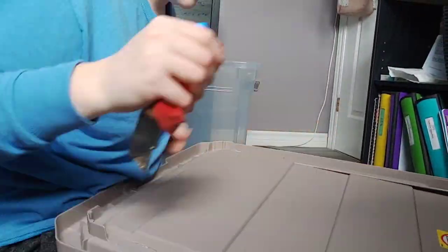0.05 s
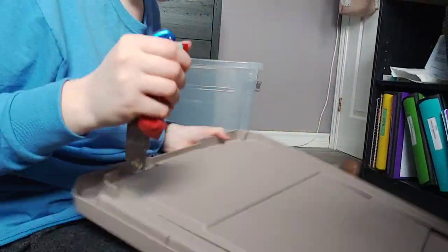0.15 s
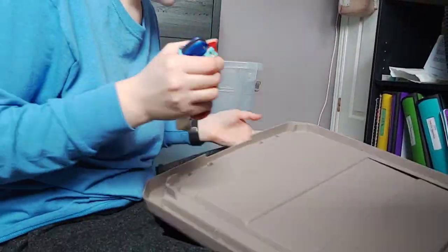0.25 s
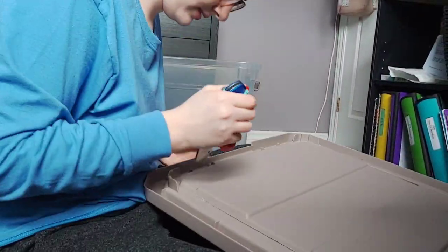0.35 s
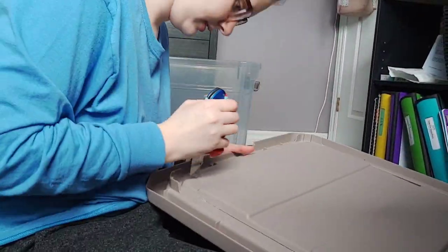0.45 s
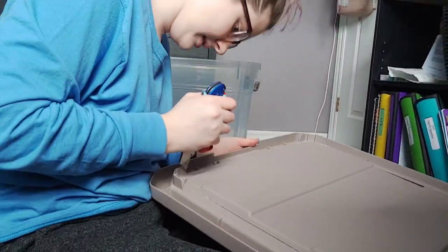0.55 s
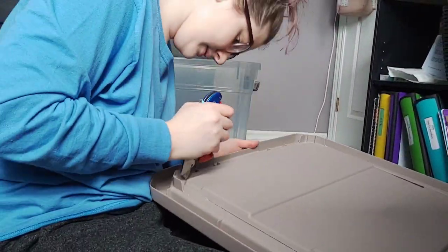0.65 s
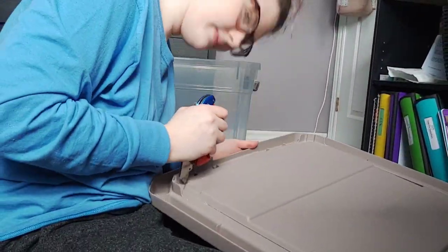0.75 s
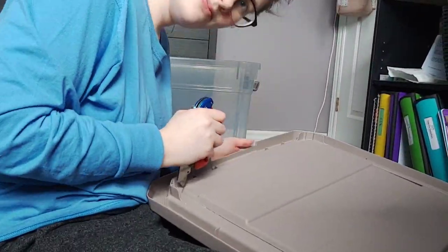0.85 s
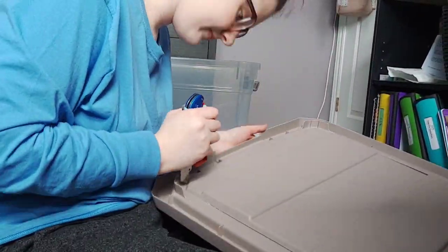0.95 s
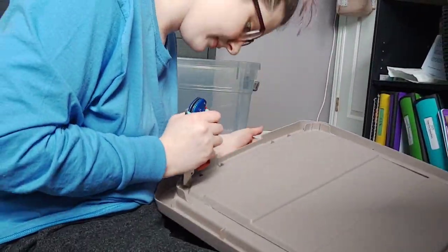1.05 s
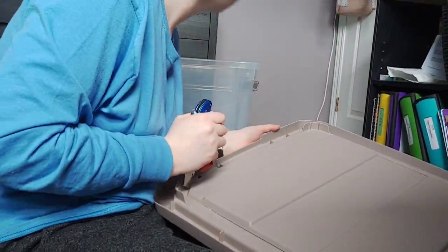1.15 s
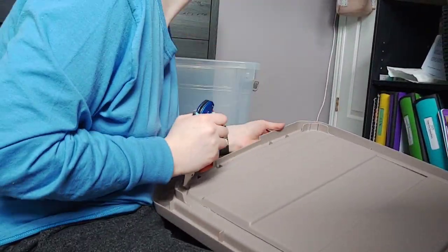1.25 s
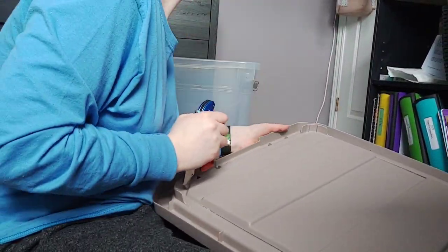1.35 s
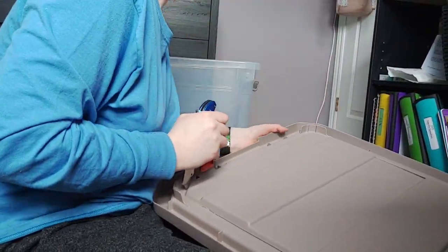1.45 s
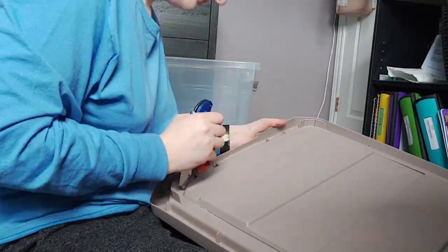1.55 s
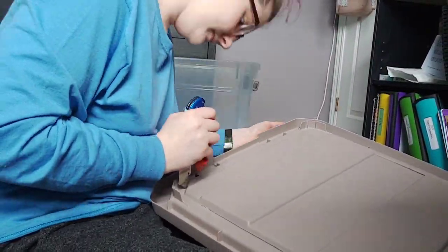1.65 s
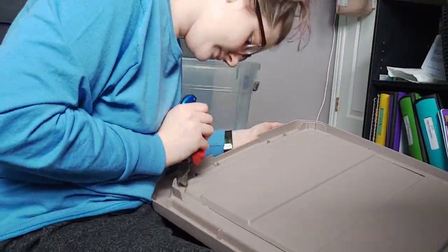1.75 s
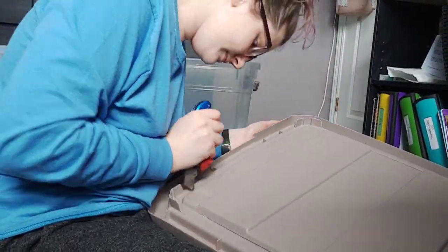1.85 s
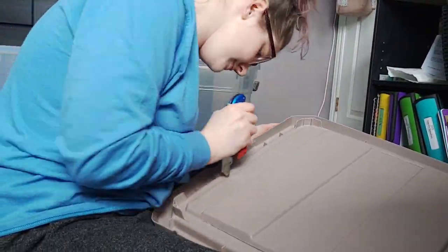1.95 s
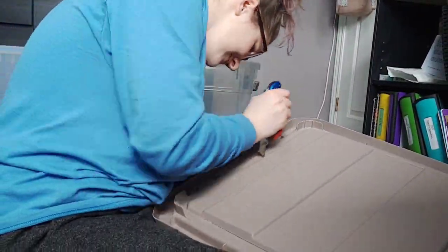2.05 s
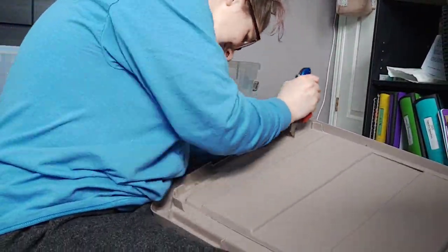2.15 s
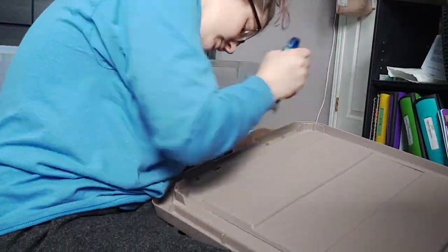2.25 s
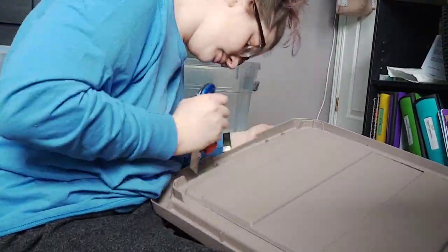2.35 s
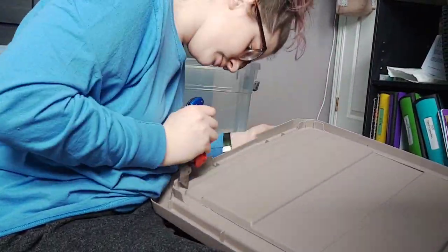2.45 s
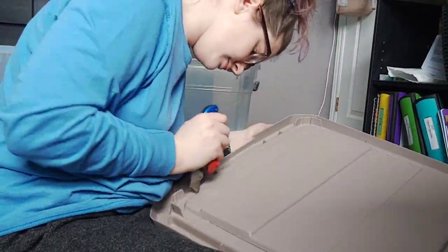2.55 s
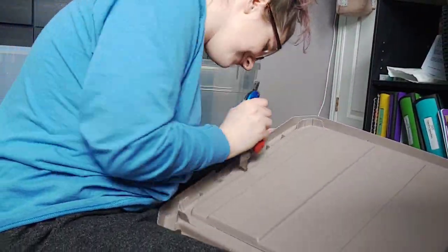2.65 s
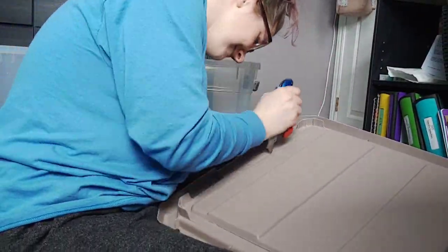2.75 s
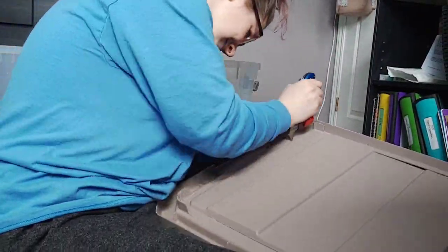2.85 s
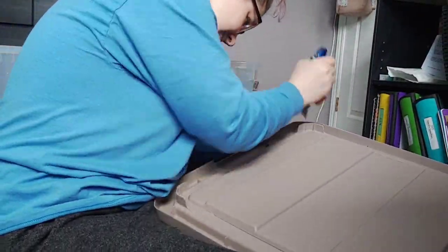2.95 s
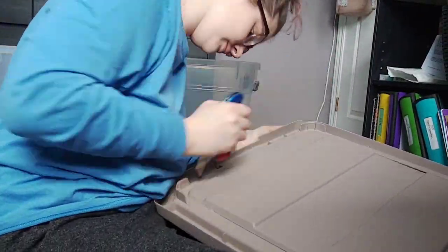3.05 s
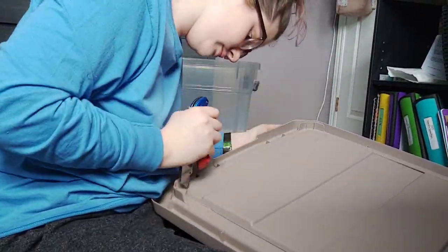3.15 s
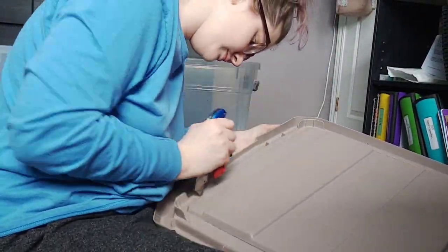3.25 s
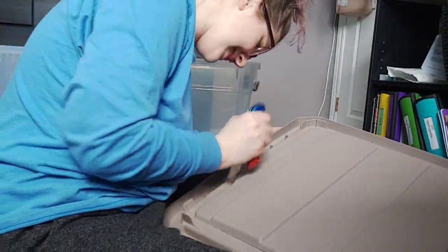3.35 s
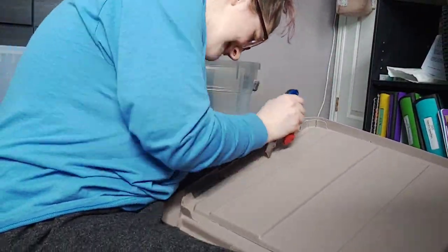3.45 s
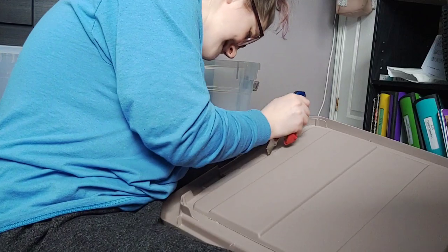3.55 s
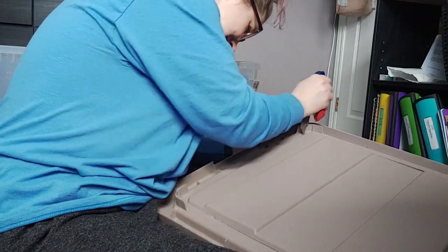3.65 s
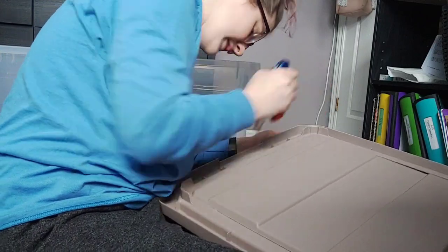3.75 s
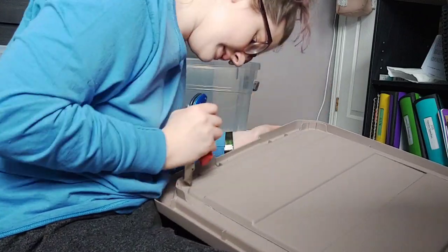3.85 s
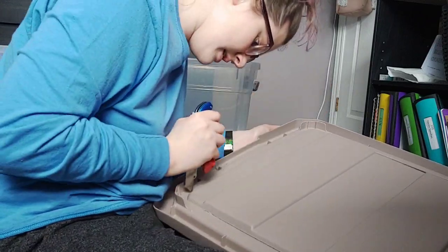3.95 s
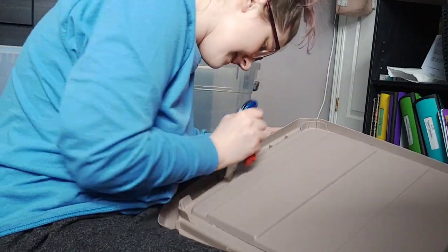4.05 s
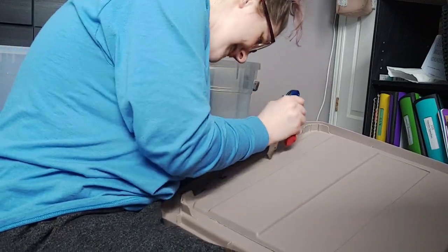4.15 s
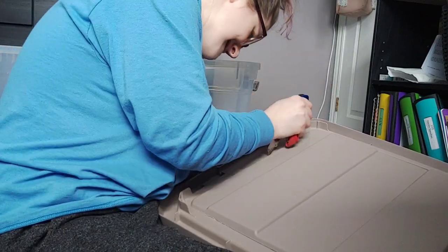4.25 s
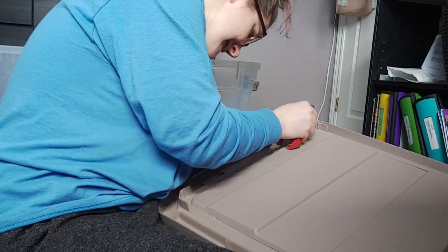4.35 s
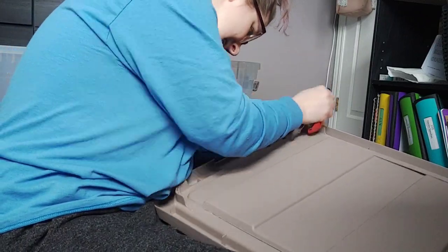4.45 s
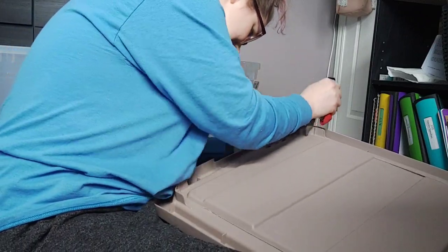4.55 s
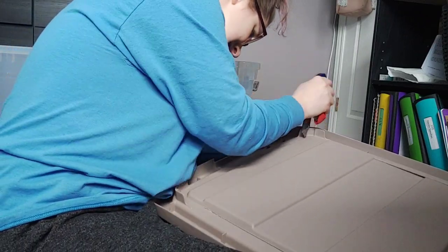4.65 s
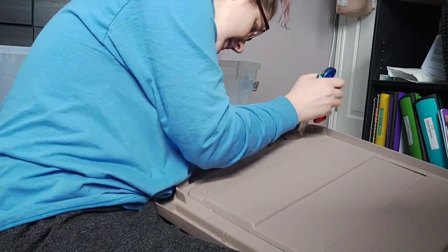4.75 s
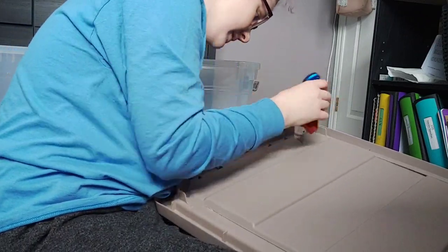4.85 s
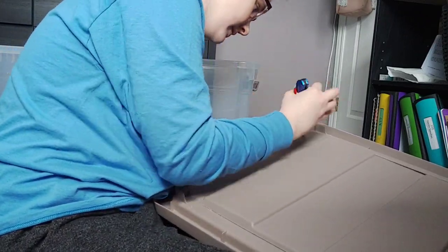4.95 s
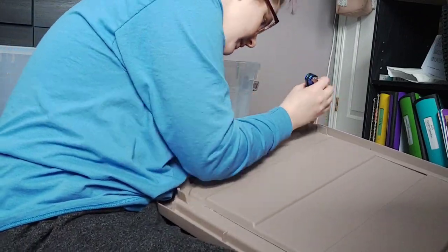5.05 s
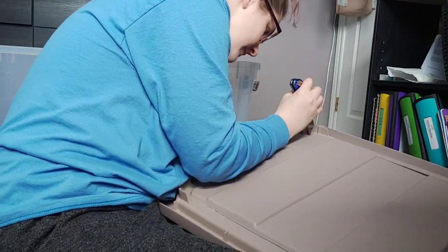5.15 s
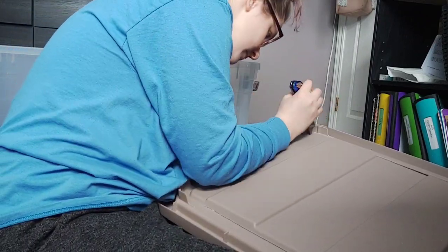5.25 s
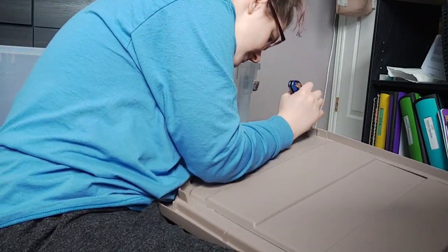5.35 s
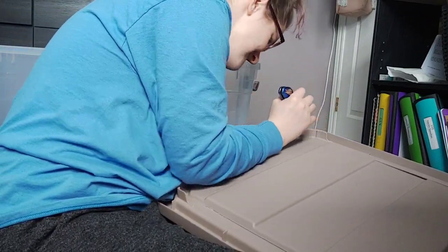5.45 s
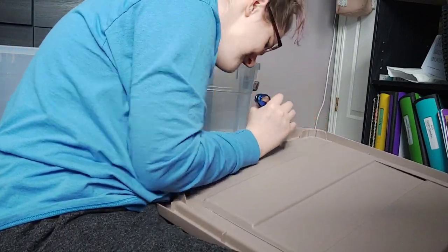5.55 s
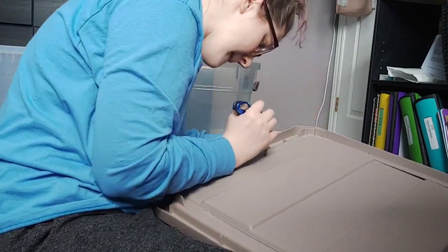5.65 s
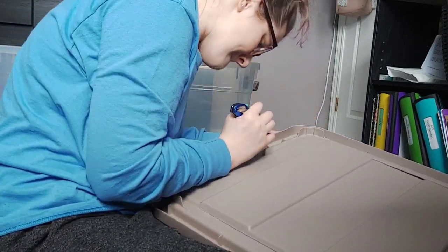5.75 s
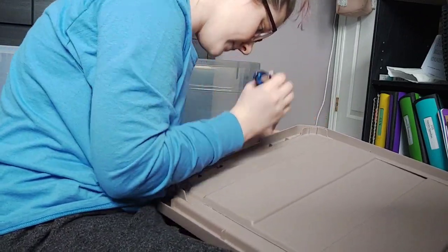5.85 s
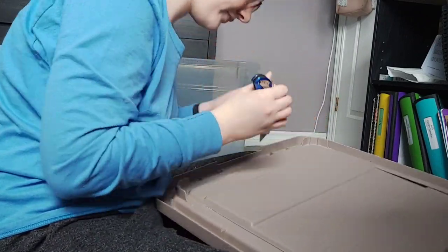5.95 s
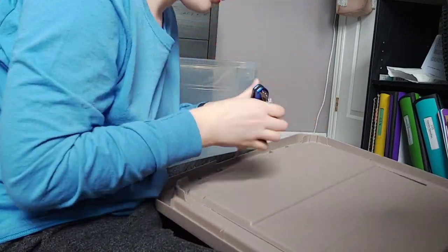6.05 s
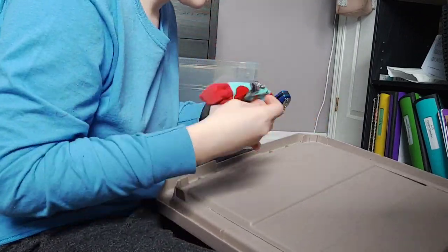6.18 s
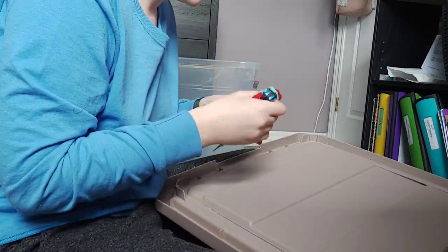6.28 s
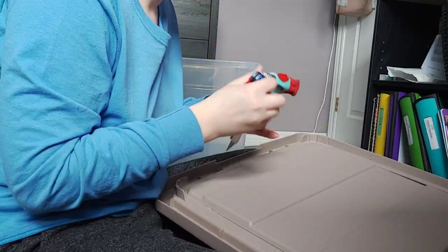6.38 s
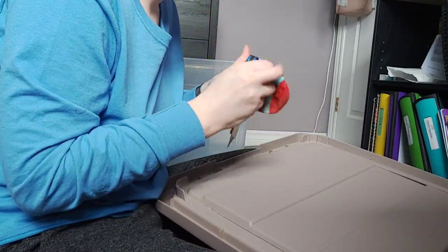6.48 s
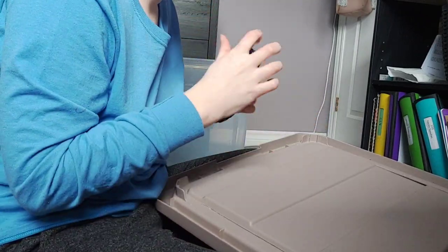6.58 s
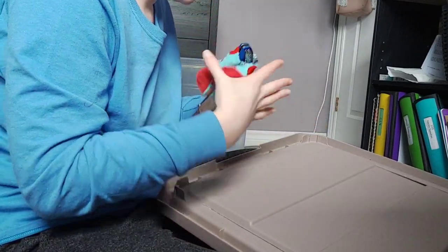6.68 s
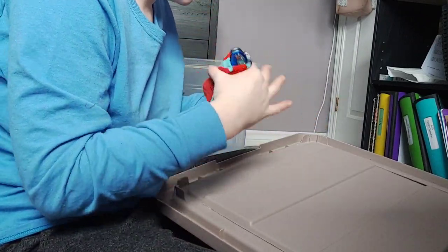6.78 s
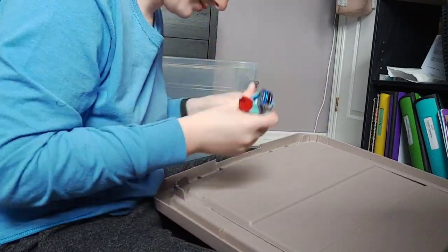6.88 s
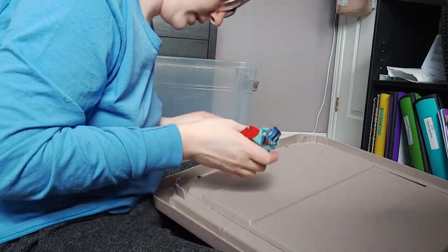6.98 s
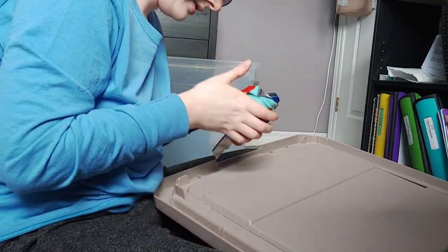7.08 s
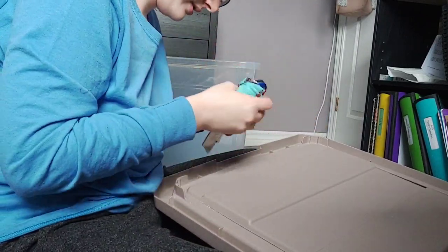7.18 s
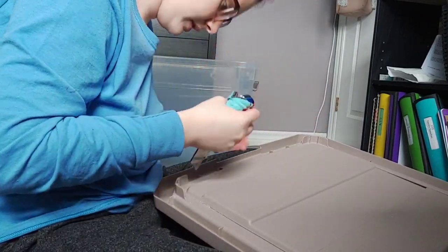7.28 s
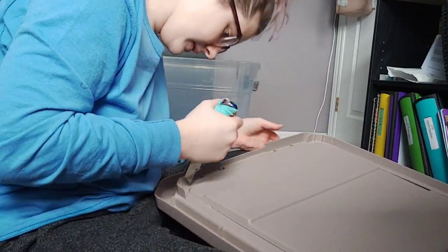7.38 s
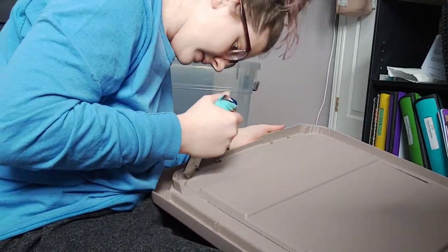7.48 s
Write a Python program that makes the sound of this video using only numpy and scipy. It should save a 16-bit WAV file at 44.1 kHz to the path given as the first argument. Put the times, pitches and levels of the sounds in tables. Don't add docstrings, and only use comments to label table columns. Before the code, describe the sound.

Close, dry scraping and cracking of hard plastic under a blade, with sharp snaps, dull lid knocks, and soft handling near the end.

```python
import sys
import numpy as np
from scipy import signal
from scipy.io import wavfile
from scipy.ndimage import uniform_filter1d

SR = 44100
rng = np.random.default_rng(int(sys.argv[2]) if len(sys.argv) > 2 else 0)


def boost_factor(decibels):
    exponent = np.asarray(decibels, float) / 20
    return 10 ** exponent


def store_wav(level_fs):
    pcm = np.round(np.clip(np.atleast_2d(level_fs), -1, 1) * 32767)
    wavfile.write(sys.argv[1], SR, pcm.T.astype(np.int16))


N = 331632

CUT_SLOPE_DB, BRUSH_SLOPE_DB, SLEEVE_SLOPE_DB = 0.15, -4, 4.5
SCRAPE_ECHO_DB, BREAK_ECHO_DB, SNAP_ECHO_DB = -12.5, -7.5, -14.5
FRACTURE_BOOM_HZ = 480


def evened(x):
    return x / np.sqrt(np.mean(x ** 2) + 1e-20)


def peak_evened(x):
    return x / np.sqrt(uniform_filter1d(x ** 2, size=180).max())


def read(points, hz):
    f, value = np.transpose(points)
    return np.interp(np.log(hz + 1), np.log(f + 1), value)


def add(mix, s, sound):
    part = mix[..., max(round(s * SR), 0):][..., :sound.shape[-1]]
    part += sound[..., :part.shape[-1]]


def causal(points, size=512):
    colour_db = read(points, abs(np.fft.fftfreq(size, 1 / SR)))
    log_gain = np.log(boost_factor(np.maximum(colour_db, -70)))
    taps = np.fft.ifft(np.exp(np.conj(signal.hilbert(log_gain)))).real[:size // 2]
    return taps / np.linalg.norm(taps)


def slips(size, per_s, spread_db):
    sizes = boost_factor(spread_db * np.minimum(rng.exponential(1, size), 4)) * rng.choice([-1, 1], size)
    return evened(sizes * (rng.random(size) < per_s / SR))


# pitch_hz, level_db (per Hz)
BLADE_COLOUR = [(590, -39.5), (1000, -4.5), (1260, -4), (1380, -6), (2230, -6.5), (2410, -7.5),
                (3270, -10.5), (4260, -6), (5020, -14), (10500, -16.5), (11900, -30), (15300, -32.5),
                (16000, -35)]


def edge(slope_db, air_db=0):
    hz, db = np.transpose(BLADE_COLOUR)
    tilt_db = slope_db * np.log2(hz / 3000)
    spot_db = rng.normal(0, 2.2, len(hz))
    db = db + tilt_db + spot_db + air_db * (hz > 11000)
    return causal(np.transpose([hz * rng.uniform(.96, 1.04), db]))


# pitch_hz, width_hz, level_db
LID_MODES = [(150, 50, -31), (305, 23, 1.5), (390, 260, 6.5), (543, 91, 3.5), (697, 160, 4.5),
             (835.8, 90, -4.5), (1118.4, 80, -9)]


def lid_ring(centre_hz, octaves, damping, pinned=False):
    t = np.arange(round(.045 * SR)) / SR
    hz, width, db = np.transpose(LID_MODES)[..., None]
    hz = hz * rng.uniform(.9, 1.1, hz.shape)
    if pinned:
        nearest = np.argmin(abs(np.log(hz / centre_hz)))
        hz[nearest], width[nearest], db[nearest] = centre_hz, 110, db.max() - 3.5
    distance = np.log2(hz / centre_hz) / octaves
    db = db + rng.normal(0, 1.0, hz.shape) - 3.3 * distance ** 2
    decay = np.exp(-np.pi * width * damping * t)
    ring = (boost_factor(db) * np.sqrt(width) * decay * np.sin(2 * np.pi * hz * t)).sum(0)
    return ring / np.linalg.norm(ring)


def ports(x, echo_db):
    at = rng.integers(2, 240, (2, 40))
    taps = np.zeros((2, 300))
    echoes = rng.choice([-1., 1.], at.shape) * boost_factor(echo_db - 3000 * at / SR)
    np.put_along_axis(taps, at, echoes, 1)
    no_bass = signal.butter(2, 800, "high", fs=SR)
    shared = 0.38 * signal.lfilter(*no_bass, taps[1])
    shared[1] += 1
    treble = signal.butter(2, 950, "high", fs=SR)
    unlike = signal.lfilter(*treble, taps[0] / np.linalg.norm(taps[0]))
    unlike = boost_factor(-.3) * np.linalg.norm(shared) * unlike + .17 * shared
    pair = boost_factor(-3.9) * np.array([shared + unlike, shared - unlike])
    return signal.fftconvolve(x[None], pair, axes=1)


def stroke(rows, slope_db):
    s, force_db, boom_db = np.transpose(rows)
    t = np.arange(s[0], s[-1], 1 / SR)
    force = boost_factor(np.interp(t, s, force_db)) * signal.windows.tukey(len(t), min(1, .014 * SR / len(t)))
    waver = boost_factor(1.9 * evened(uniform_filter1d(rng.standard_normal(len(t)), size=200)))
    drive = slips(len(t), 14000, 3.3) * force * evened(waver)
    boom = boost_factor(np.interp(t, s, boom_db) - 3.0)
    travel = (t - t[0]) / .022
    out = np.zeros((2, len(t) + 4000))
    for spot in range(int(travel[-1]) + 2):
        near = abs(travel - spot) < 1
        part = drive[near] * np.cos(np.pi / 2 * (travel[near] - spot))
        sound = signal.fftconvolve(part * boom[near], lid_ring(400, 6.7, 0.46))
        add(sound, 0, np.convolve(part, edge(slope_db, air_db=2.5)))
        add(out, np.argmax(near) / SR, ports(sound, SCRAPE_ECHO_DB))
    return s[0], out


def bite(s, rise, fall, force_db, boom_db, slope_db):
    edge_db = force_db - 27
    return stroke([(s - rise, edge_db, boom_db), (s, force_db, boom_db), (s + fall, edge_db, boom_db)], slope_db)


def crack(peak_db, boom_db, boom_hz, slope_db, t60):
    t = np.arange(round(.05 * SR)) / SR
    build_up = np.minimum(t / (0.05 * t60), 1)
    fall = boost_factor(-60 * t / np.clip(t60, .004, .3)) * build_up
    fade = np.clip((.034 - t) / 0.012, 0, 1)
    burst = slips(len(t), 8100, 0.27) * fall
    tick = np.convolve(burst, edge(slope_db))[:len(t)]
    damping = np.clip((.022 / t60) ** 1.2, .7, 6)
    others = np.convolve(burst, lid_ring(boom_hz, 0.51, damping, pinned=True))[:len(t)]
    patch = fall * np.sin(2 * np.pi * boom_hz * t)
    boom = peak_evened(patch) + boost_factor(-2.5) * peak_evened(others)
    sound = peak_evened(tick) + boost_factor(boom_db) * peak_evened(boom)
    return ports(boost_factor(peak_db - 0.5) * fade * sound, BREAK_ECHO_DB)


# start_s, length_s, first_force_db, last_force_db, boom_db (lid against blade)
DRAGS = [(.07, 0.069, -72.5, -46, 9.5), (0.22, 0.073, -49, -55.5, 6), (.285, .04, -49, -46, 11.5),
         (2.856, 0.03, -38.5, -40, -5.5), (0.51, 0.021, -51, -45.5, 11), (0.871, 0.4, -76.5, -62, 9),
         (0.159, 0.036, -45, -38, 10), (1.827, 0.021, -58.5, -41.5, 3.5), (1.851, 0.026, -42, -37.5, 3.5),
         (2.117, 0.044, -46.5, -43, -7), (1.901, .3, -49, -47.5, -0.5), (2.571, 0.065, -41, -44.5, 1),
         (2.649, 0.0444, -46, -46, 1), (2.752, 0.056, -41, -40.5, -1.5), (2.949, 0.02024, -55, -48.5, -5),
         (3.371, 0.062, -39.5, -49.5, 1), (3.599, 0.041, -53.5, -38.5, 2), (3.642, 0.0265, -38, -37.5, -5),
         (3.7, 0.021, -45, -60.5, 10), (3.928, 0.069, -68.5, -63, 15), (3.998, 0.028, -43.5, -38.5, 2.5),
         (4.057, 0.073677, -50, -41, 0.5), (4.503, 0.057, -55.5, -45, 0.5), (4.783, 0.017, -49, -46, 13.5),
         (4.942, 0.039, -62, -54.5, 16), (5.269, 0.026, -46.5, -51, 8), (5.498, 0.099, -56.5, -46, 5),
         (5.886, 0.049, -43, -39.5, 5.5), (7.368, 0.034, -57.5, -59.5, 9), (7.422, 0.082, -61, -56.5, 6.5),
         (2.534, 0.025, -36.5, -37, 1), (4.951, 0.03, -50.5, -56, 7.5), (0.159, .02, -30, -38, 5)]


def drags(lid):
    for s, length, first_db, last_db, boom_db in DRAGS:
        end = s + length
        pull = [(s, first_db, boom_db), (end, last_db, boom_db), (end + 0.035, last_db - 26, boom_db)]
        add(lid, *stroke(pull, CUT_SLOPE_DB))


# peak_s, rise_s, fall_s, force_db, boom_db (lid against blade)
BITES = [(0.337, 0.019, 0.036, -31.5, 1), (.44, 0.036, 0.034, -38, 11), (2.129, 0.031, 0.01, -50, 1),
         (1.924, 0.02, 0.021, -42, -1.5), (2.81, .03, 0.032, -49, 2), (3.43, 0.042, 0.041, -46.5, 0),
         (3.295, 0.024, 0.03, -36.5, 3), (2.558, 0.032, 0.035, -34.5, 3), (2.879, 0.03, 0.051, -34, -13),
         (3.267, 0.023, 0.062, -31, -0.5), (3.885, 0.013, 0.045, -43, 8), (4.046, 0.039, 0.02, -31.5, -2.5),
         (4.426, 0.016, 0.081, -35.5, 0), (4.649, 0.0089, 0.0079, -47, 17),
         (4.677, 0.0046, 0.069, -31, 2.5), (5.432, 0.0078, 0.033, -36.5, 1.5), (5.461, .02, 0.069, -40, 3),
         (1.582, 0.033, .012, -49, -2), (2.536, 0.041, 0.022, -46.5, 7.5), (2.68, 0.073, 0.02263, -56, -6),
         (2.755, 0.031, 0.0256, -48.5, 3), (3.372, 0.07, 0.0181, -52, 9), (4.085, 0.019, 0.024, -39.5, 7.5),
         (5.37, .03, 0.093, -58.5, 2), (5.94, 0.034, 0.031, -32.5, -5.5), (6.227, 0.034, .06, -58, -3),
         (7.471, 0.054, 0.11, -65.5, -3)]


def bites(lid):
    for row in BITES:
        add(lid, *bite(*row, CUT_SLOPE_DB))


# start_s, peak_db, boom_db, brightness_db (per octave), t60_s
FRACTURES = [(0.1859, -16, -5.5, 3.5, 0.023), (0.335, -21, -33, 4.5, 0.017),
             (1.6297, -49.5, -20, -2, 0.026), (1.9154, -40, 4, -5.5, 0.06), (2.223, -45.5, -7, 4, 0.042),
             (2.2893, -55, -5, 10.5, 0.03), (2.5385, -35.5, -20.5, 5, .016), (2.874, -31, -9, 4, 0.013),
             (2.9402, -44, -18.5, 8, 0.053), (3.123, -53, -5, 1.5, 0.035), (3.227, -41.5, 5, 5, 0.027),
             (3.262, -33, -13, 6.5, 0.0147), (3.6157, -36.5, -4.5, 1.5, 0.012),
             (4.0036, -44, -3, -4.5, 0.021), (4.4244, -40.5, -19, -11.5, 0.13),
             (4.646, -33.5, -1, 2.5, 0.03), (4.6735, -28.5, 0.5, 5, 0.04),
             (4.6824, -23.5, -10.5, 2, 0.0069), (5.1137, -25, -5, -5, 0.0075),
             (5.2791, -44, -7.5, 10.5, 0.007), (5.435, -26, -25, 0, 0.011), (6.042, -52.5, -12, 3, 0.02235),
             (6.487, -53.5, -9, 10.5, 0.079), (6.7799, -49, -9, 7.5, 0.013)]


def fractures(lid):
    for s, peak_db, boom_db, slope_db, t60 in FRACTURES:
        boom_hz = FRACTURE_BOOM_HZ * rng.uniform(0.39, 2.3)
        add(lid, s, crack(peak_db, boom_db, boom_hz, slope_db, t60))


# start_s, peak_db, brightness_db (per octave)
SNAPS = [(0.1576, -5.5, -5.5), (.1608, -12.5, -2.5), (0.1862, -12, 0.5), (1.017, -39, -5),
         (1.0412, -42, -11), (1.229, -53, -1), (1.2975, -41, -15.5), (1.322, -46.5, -6), (1.8745, -29, -5),
         (2.226, -45, 8.5), (2.5578, -26, -4), (3.23, -46, 3), (3.265, -26, -1), (3.296, -29, 11),
         (3.662, -23, -6), (4.357, -44.5, -8.5), (4.6776, -28, 3), (4.6808, -6, 2.5), (5.1104, -24, -1),
         (5.1153, -16.5, 0.5), (5.4361, -24.5, 3), (5.9167, -26, -6), (0.3348, -23, 3),
         (3.8821, -36, -11.5), (0.2106, -30, -3.5), (5.8881, -24, 9), (5.9015, -30, 0), (5.933, -22, 1),
         (6.042, -32.5, 1.5), (6.658, -48, -4), (7.4212, -35.5, -13), (7.424, -31, -2.5), (7.447, -30, -18)]


def snaps(lid):
    for s, peak_db, slope_db in SNAPS:
        taps = edge(slope_db)
        add(lid, s, ports(boost_factor(peak_db) * taps / abs(taps).max(), SNAP_ECHO_DB))


# start_s, peak_db, boom_db, patch_hz, t60_s
KNOCKS = [(0.1305, -36.5, 15, 566, 0.13), (0.157, -6.5, 2, 436, 0.018), (0.1626, -18.5, -2, 338, 0.041),
          (0.2116, -34, 12, 530, 0.016), (5.112, -46, 17.5, 290, 0.036), (4.426, -50.5, 16.5, 380, 0.053),
          (3.884, -46.5, 13, 310, 0.065), (0.403, -52.5, 24, 225, 0.016), (0.77, -48.5, 4.5, 272.7, 0.0066),
          (1.037, -50.5, 15, 392, 0.036), (1.1435, -51, 10, 194, 0.14), (1.5848, -44.5, 8.5, 548, 0.016),
          (1.735, -61, 13.5, 348, 0.014), (1.825, -48.5, 15.5, 338.2, 0.025),
          (3.883, -39.5, 1.5, 533.6, 0.074), (3.9555, -49.5, 9.5, 314, 0.013),
          (4.3531, -60, 17, 415.6, 0.019), (4.7921, -39.5, 5.5, 484, 0.096),
          (4.9567, -38.5, 11.5, 970.6, 0.062), (4.976, -42.5, 3, 480, 0.03), (4.648, -42.5, 8, 1530, 0.011),
          (5.1114, -33, 10.5, 1080, .012), (5.8872, -35.5, 12, 220, 0.0085),
          (5.9146, -34, 10.5, 470, 0.023), (7.4263, -41.5, 19, 290, 0.029), (7.4421, -58, 22, 392, 0.035),
          (7.468, -55, 14, 340, 0.055), (.962, -63, -6, 1106, 0.03), (1.227, -55, 12, 680.5, 0.034),
          (3.325, -53, 15.5, 493, 0.01), (1.641, -51, 21, 480, 0.025), (5.286, -56.5, 19, 396, 0.067)]


def knocks(lid):
    for s, peak_db, boom_db, patch_hz, t60 in KNOCKS:
        add(lid, s, crack(peak_db, boom_db, patch_hz, -3.5, t60))


def knife_drop(lid):
    start_s, peak_db, hz, t60 = .158, -16, 152, .08
    t = np.arange(round(.08 * SR)) / SR
    ring = boost_factor(peak_db - 60 * t / t60) * np.minimum(t / 0.00041, 1) * np.sin(2 * np.pi * hz * t)
    add(lid, start_s, ring * boost_factor([[1.5], [-1.5]]))


# middle_s, length_s, level_db, pitch_hz
CREAKS = [(0.912, 0.041, -64, 900), (0.97, 0.042, -54, 1070), (1.016, 0.03, -53, 1282),
          (1.09, 0.038, -63, 1150), (1.15, 0.04994, -54, 1226), (1.237, 0.067, -51.5, 990),
          (1.304, 0.054, -50.5, 1220), (1.866, 0.075, -37.5, 895), (1.95, 0.047, -49.5, 3549),
          (2.007, 0.055, -48, 4220), (2.068, .09, -49.5, 1090), (2.138, 0.074, -45, 4200),
          (2.158, 0.11, -45, 900), (2.6, 0.075, -39, 911), (2.622, 0.069, -49, 4200),
          (2.672, 0.056, -38.5, 1190), (2.784, 0.08, -40, 905), (2.808, 0.035, -47, 2110),
          (2.884, 0.047, -35.5, 930), (3.295, 0.02747, -43, 3800), (3.384, 0.037, -45, 4333),
          (3.429, 0.042, -41.5, 1197), (3.627, 0.0456, -47, 1010), (3.663, 0.056, -38.5, 940),
          (3.663, 0.051, -39, 4130), (4.046, .03, -46, 855.1), (4.123, 0.069, -43, 1266),
          (4.108, .08, -45, 4250), (4.432, 0.033, -37.5, 1270), (4.466, 0.057, -52, 4250),
          (4.961, 0.038, -47.5, 4130), (5.437, 0.018, -48, 1106), (0.439, 0.038, -35.5, 430),
          (.44, 0.026, -42, 2260), (1.642, 0.037, -41, 480), (3.895, 0.028, -34, 530.5),
          (5.819, 0.029, -59, 2244), (5.924, .05, -31, 480), (6.079, 0.16, -60.5, 290),
          (6.665, 0.034, -55.5, 1097), (7.033, 0.24, -70, 1700), (.34, 0.028, -33.5, 6600),
          (4.68, 0.018274, -29, 2300)]


def creaks(lid):
    for s, length, level_db, hz in CREAKS:
        size = round(length * SR)
        width = 0.26
        band_hz = hz * np.array([1 - width / 2, 1 + width / 2])
        band = signal.butter(2, band_hz, "band", fs=SR, output="sos")
        sung = evened(signal.sosfilt(band, slips(size, 5000, 2.4))) * np.hanning(size)
        add(lid, s - length / 2, ports(boost_factor(level_db) * sung, BREAK_ECHO_DB))


# start_s, peak_db, brightness_db (per octave)
TICKS = [
    (1.018, -60, -7),
    (1.228, -51, -11),
    (1.298, -57, -4.5),
    (5.358, -51, -4),
    (5.458, -49, -1),
    (5.503, -43.5, -2),
    (6.409, -54.5, 22.5),
    (6.5645, -50.5, 8.5),
    (7.4275, -33, 6),
]


def ticks(lid):
    for s, peak_db, slope_db in TICKS:
        boom_hz = FRACTURE_BOOM_HZ * rng.uniform(0.732, 2.1)
        add(lid, s, crack(peak_db, -12, boom_hz, slope_db, 0.017))


# peak_s, rise_s, fall_s, force_db, boom_db
BRUSHES = [(.67, 0.044, 0.055, -66, 17.3), (0.919, 0.099, 0.047, -62, 9.5), (.97, 0.036, 0.031, -60, 7.9),
           (1.015, 0.01, 0.035, -53.5, 11), (1.085, 0.041, 0.01963, -53.5, 5.8),
           (1.149, 0.033, 0.032, -63.5, 25.3), (1.23, 0.024, 0.0619, -59, 8.9),
           (1.31, 0.044, 0.039, -56.5, 16.6), (1.648, 0.037, 0.049, -46.5, 12),
           (1.74, 0.024, 0.014, -73.5, 18), (2.461, 0.054, 0.019, -55, 6.8),
           (3.126, 0.031, 0.045, -52, 9.9), (5.24, 0.026, 0.032, -53, 8.9),
           (3.17, 0.094, 0.29, -72.5, 18.4), (5.821, 0.027, 0.041, -50.5, 2.8),
           (5.85, 0.016, 0.014, -64, 14), (5.93, 0.057, 0.031, -39, 11.7), (7.44, 0.018, 0.063, -51, 12)]


def brushes(lid):
    for row in BRUSHES:
        add(lid, *bite(*row, BRUSH_SLOPE_DB))


# peak_s, rise_s,
# fall_s, force_db
SLEEVES = [(.125, .06, 0.037, -61), (.345, 0.022, 0.035, -34), (.44, .05, 0.061, -59),
           (.54, .04, 0.034, -46.5), (.93, .07, 0.082, -59), (1.04, .05, 0.039, -56.5),
           (1.095, .04, 0.05194, -57.5), (1.19, 0.024, 0.029, -56.5), (1.235, .04, 0.035, -61),
           (1.315, .04, .03, -61.5), (5.96, 0.039, 0.051, -54), (6.235, 0.046, 0.063, -63.5),
           (6.601, 0.51, 0.37, -68), (5.1, .4, 0.18, -90), (2.55, 0.026, 0.0254, -40),
           (2.879, 0.036, 0.04, -41), (5.94, 0.026, 0.026, -39), (7.436, 0.026, 0.056, -52)]


def sleeves(lid):
    for row in SLEEVES:
        add(lid, *bite(*row, -24.5, SLEEVE_SLOPE_DB))


# pitch_hz, level_db (per Hz)
GRIP_COLOUR = [(290, -27.5), (500, 2.5), (877, -3), (1080, -3.5), (1490, -5), (2510, -8), (6000, -44),
               (7800, -55), (13200, -120)]
# middle_s, length_s, level_db, brightness_db (per octave)
FINGERS = [
    (6.41, 0.027, -55, 6),
    (6.498, 0.046, -57.5, 4),
    (6.544, 0.037, -50.5, 6),
    (6.597, 0.044, -53, 5.5),
    (6.66, 0.057, -44.5, 2.5),
    (6.714, 0.032, -52.5, 6),
    (6.788, 0.1, -62, 3),
    (6.858, 0.13, -60.5, 5.5),
    (7.039, 0.26, -68, -0.5),
]


def fingers(lid):
    for s, length, level_db, slope_db in FINGERS:
        t = np.arange(-length / 2, length / 2, 1 / SR)
        press = boost_factor(level_db - 13 * abs(2 * t / length)) * signal.windows.tukey(len(t), .4)
        grip = [(hz, db + slope_db * np.log2(hz / 1500)) for hz, db in GRIP_COLOUR]
        rub = np.convolve(slips(len(t), 6900, 1.63) * press, causal(grip))
        add(lid, s + t[0], ports(rub, SCRAPE_ECHO_DB))


def room_tail(x):
    t = np.arange(round(.2 * SR)) / SR
    tail = rng.standard_normal((2, len(t))) * boost_factor(-60 * t / .08) * np.minimum(t / .006, 1)
    tail = signal.lfilter(*signal.butter(1, 5000, fs=SR), tail)
    return signal.oaconvolve(x, tail / np.linalg.norm(tail[0]), axes=1)[:, :N]


# time_s, firing_hz, level_db, load (0 to 1)
CARS = [
    [(4.82, 133.3, -74, 0.82), (4.95, 134.5, -51, 0.8), (5.02, 129.5, -55.5, 0.36), (5.2, 128.2, -54, 0.23),
     (5.3, 132, -58, 0.9), (5.4, 136, -77, .9)],
    [(6.62, 97.1, -83, 0.42), (6.75, 112.6, -52, 1), (6.83, 119.9, -54, 1), (6.95, 138.1, -53.5, 0.76),
     (7.05, 134.4, -52.5, 0.05), (7.36, 134.3, -64.5, 0), (7.42, 139, -75, 0.4)],
]
UPPER_DB = [3.5, -41]


def cars(street):
    for rows, upper_db in zip(CARS, UPPER_DB):
        s, *columns = np.transpose(rows)
        t = np.arange(s[0], s[-1], 1 / SR)
        hz, level_db, load = (np.interp(t, s, c) for c in columns)
        firing_db = level_db - 8.5 * load
        half_db = level_db - 14.5 * (1 - load)
        third_db = firing_db + upper_db - 28 * load
        drift, *flutter = evened(uniform_filter1d(rng.standard_normal((6, len(t))), size=1300))
        turn = 2 * np.pi * np.cumsum(hz * (1 + 0.026 * drift)) / SR
        orders = [(.5, half_db), (1, firing_db), (1.5, third_db - 5.), (2, third_db - 3.5), (3, third_db)]
        hum = sum(boost_factor(db + 1.2 * f) * np.sin(k * turn) for (k, db), f in zip(orders, flutter))
        add(street, s[0], np.sqrt(2) * hum * signal.windows.tukey(len(t), .2))


# peak_s, peak_db, fall_db (per second)
BUMPS = [
    (.17, -40.5, 220),
    (1.051, -63, 59.5),
    (2.5, -60, 31.5),
    (3.9, -60, 25),
    (5.01, -52.5, 8),
    (5.55, -60, 60),
    (5.88, -52, 76.5),
    (6.36, -59, 39),
    (6.79, -54.5, 35.5),
]


def rumble():
    band = signal.butter(2, [45, 100], "band", fs=SR, output="sos")
    deep = evened(signal.sosfilt(band, rng.standard_normal(N)))
    s, peak_db, fall_db = np.transpose(BUMPS)[..., None]
    t = np.arange(0, N / SR, .005)
    away = np.maximum(t - s, -2.8 * (t - s))
    bumps = boost_factor(peak_db - 3.0 - fall_db * away)
    level = np.sqrt(boost_factor(-70.5) ** 2 + (bumps ** 2).sum(0))
    return deep * np.interp(np.arange(N) / SR, t, level)


# pitch_hz, level_db (per Hz)
HISS_COLOUR = [(25, -13), (60, -12.5), (120, -3.5), (250, -1.5), (500, -8.5), (1000, -11.5), (2000, -14.5),
               (4000, -19.5), (7000, -25.5), (10300, -22.5), (16000, -25.5)]
# time_s, level_db
MURMUR = [(0.0, -55), (.35, -49), (.58, -56.5), (2.7, -58), (4.5, -56), (7.52, -55)]
# pitch_hz, likeness (0 to 1)
LIKENESS = [(60, 0.96), (130, 0.21), (300, 0.24), (1000, 0.091), (4000, 0.021)]


def room_hiss():
    frames, hz = N // 256 + 5, np.fft.rfftfreq(1024, 1 / SR)
    a, b, c, d, patches = rng.standard_normal((frames, 513, 5)).T
    patches = uniform_filter1d(uniform_filter1d(patches, size=10, axis=0), size=10, axis=1)
    patches = evened(patches)
    s, murmur_db = np.transpose(MURMUR)
    low = 1 / (1 + (hz[:, None] / 3500) ** 2)
    swell_db = low * np.interp(np.arange(frames) * 256 / SR, s, murmur_db - np.median(murmur_db))
    drift_db = evened(uniform_filter1d(rng.standard_normal(frames), size=30))
    swell_db += (1 - low) * drift_db
    same = np.clip(read(LIKENESS, hz), -1, 1)[:, None]
    left = a + 1j * b
    right = same * left + np.sqrt(1 - same ** 2) * (c + 1j * d)
    level_db = read(HISS_COLOUR, hz)[:, None] + 0.61 * patches + swell_db - 69.5
    z = np.array([left, right]) * boost_factor(level_db)
    return signal.istft(z, nperseg=1024, noverlap=768)[1][:, :N]


def scene():
    lid, street = np.zeros((2, N)), np.zeros(N)
    for source in (drags, bites, fractures, snaps, knocks, creaks, ticks, brushes, sleeves, fingers):
        source(lid)
    lid = signal.lfilter(*signal.butter(2, 150, "high", fs=SR), lid)
    knife_drop(lid)
    cars(street)
    wet = boost_factor(-23) * room_tail(lid)
    return lid + wet + (street + rumble()) * boost_factor([[.6], [-.6]]) + room_hiss()


def top_cut(x):
    return signal.sosfilt(signal.butter(12, 16130, fs=SR, output="sos"), x)


def record(dry):
    band_limit = signal.firwin(511, 16250, fs=SR)[None]
    limited = signal.oaconvolve(np.clip(dry, -1, 1), band_limit, "same")
    mix = limited - .0032
    return top_cut(mix)


dry = scene()
out = record(dry)
store_wav(out)
```